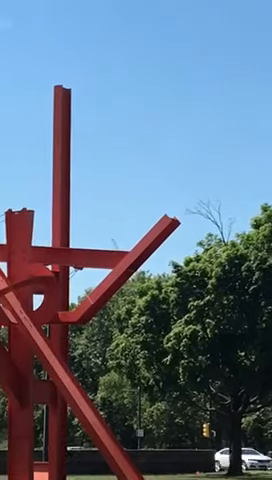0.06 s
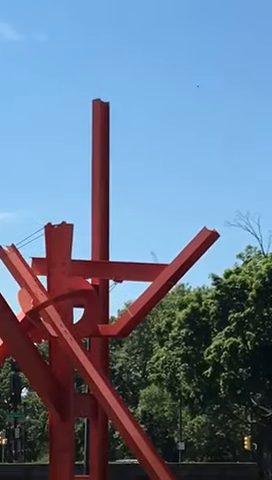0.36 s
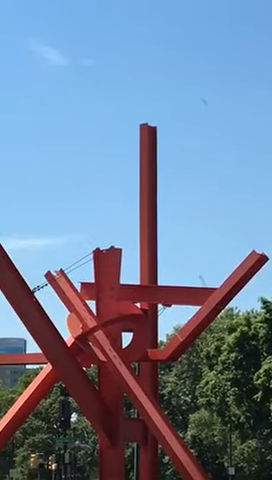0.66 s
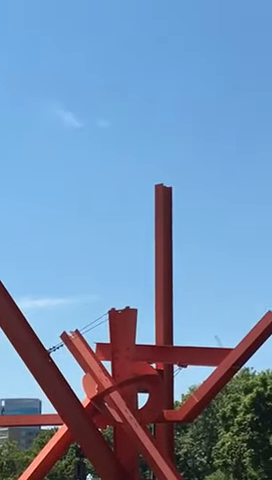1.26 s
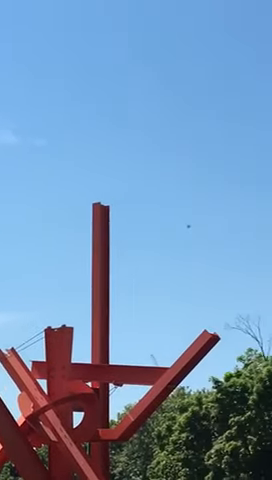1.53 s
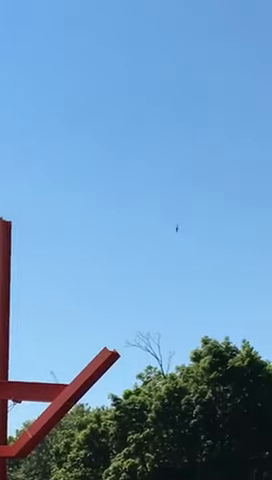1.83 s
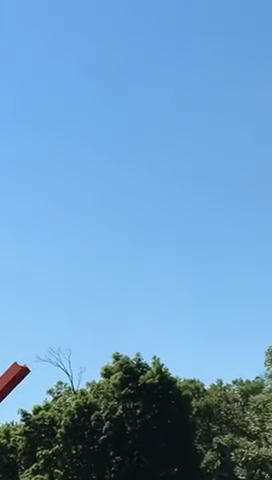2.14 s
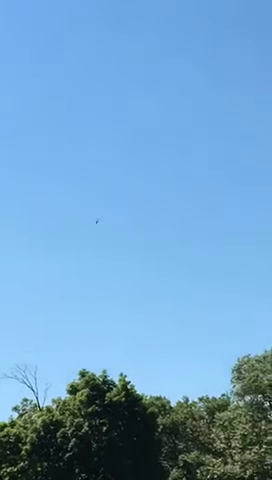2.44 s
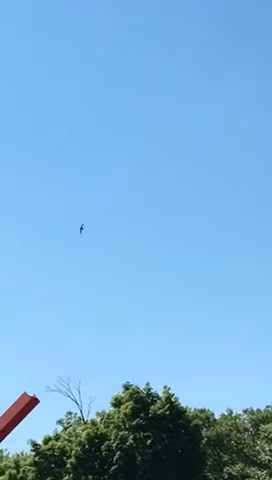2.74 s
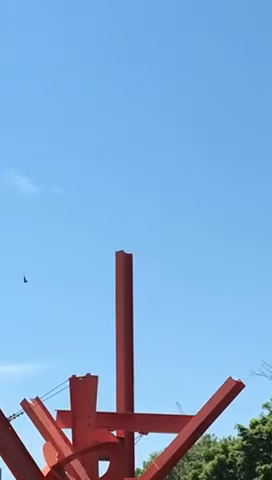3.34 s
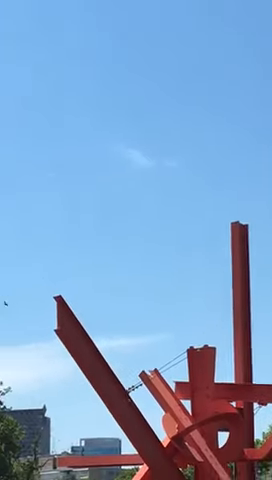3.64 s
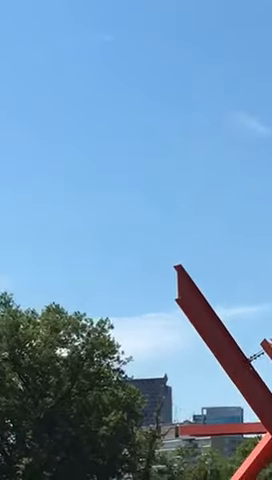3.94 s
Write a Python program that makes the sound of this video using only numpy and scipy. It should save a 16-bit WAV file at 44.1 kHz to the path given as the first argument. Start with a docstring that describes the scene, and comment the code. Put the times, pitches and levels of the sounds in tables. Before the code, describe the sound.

Steady road traffic carries into a city park under the low drone and thin whine of a heavy engine. A few faint bird chirps and light ticks sound, tyres rush past midway, and the deep rumble builds.

```python
"""City traffic heard from a park. From the start a heavy engine drones and growls over the rumble and
hiss of the streets, slowly gathering speed, its fan whining along. In the first second small birds chip
and whistle overhead, echoing off the trees, and a dry tick sounds close by; fainter ones follow.
Around two seconds in, passing tyres swell to a roar and hiss, and the birds chip again.
Toward the end the fan whine sinks away while the drone and the deep rumble build."""
import sys
import numpy as np
from scipy import signal
from scipy.fft import rfft, irfft
from scipy.io import wavfile
from scipy.ndimage import uniform_filter1d

SR = 44100
rng = np.random.default_rng(int(sys.argv[2]) if len(sys.argv) > 2 else 0)


def materialize(psi):
    """Save the field psi as 16-bit PCM at rate SR to the path in sys.argv[1].

    A 1-D psi becomes a single channel; in a 2-D psi each row is a channel.
    """
    bounded = np.clip(np.atleast_2d(psi).T, -1, 1)
    quanta = np.round(bounded * 32767).astype(np.int16)
    wavfile.write(sys.argv[1], SR, quanta)


N = 176400
TIME = np.arange(N) / SR

# engine firing rate (time [s], rate [Hz])
FIRING_RATE = [(0, 66), (.75, 66.6), (1.25, 67.7), (1.75, 68.3), (2.1, 69.2), (2.55, 69.6), (2.9, 70.9),
               (3.12, 71.2), (3.27, 72.2), (3.42, 72.2), (3.55, 73.1), (4, 74.3)]
# level rides for the firing tone and its octave (time [s], level [dB])
DRONE_LEVEL = [(0, -25), (.2, -26), (.29, -35), (.36, -26), (.6, -25.5), (.8, -23), (1.1, -23.5),
               (1.21, -33), (1.4, -23.5), (1.65, -23), (1.92, -25.5), (2.05, -20.5), (2.3, -25.5),
               (2.44, -21), (2.6, -24), (2.76, -19), (2.98, -21), (3.1, -18.5), (3.3, -21), (3.45, -19),
               (3.68, -19.5), (3.75, -16), (3.83, -20.5), (4, -17.5)]
OCTAVE_LEVEL = [(0, -37), (.3, -32.5), (.48, -33), (.59, -40), (.67, -32), (.82, -32), (1.02, -24),
                (1.16, -30), (1.3, -24.5), (1.95, -24.5), (2.2, -22), (2.58, -21), (2.72, -24), (2.95, -23),
                (3.27, -33), (3.38, -27), (3.55, -33), (3.63, -25), (3.85, -36), (4, -31)]
# weaker engine tones (pitch [x firing rate], crest level [dB], crest time [s], time to fall 6 dB [s])
SHAFT_TONES = [(.67, -39, 3.4, 2.2), (1.33, -44, 2.5, 3), (1.67, -43, 2, 3), (3, -42, 1.5, 1.5),
               (3.55, -48, 1.4, .5), (4.23, -43, 1.25, .45), (4.23, -48, 3.7, .9), (4.78, -48, 2.9, .4),
               (5.17, -52, 1.5, 1.3), (5.18, -47.5, 3.5, .5), (9.62, -51, 2.8, .3), (9.62, -52, 2.08, .18),
               (20.48, -50, 3.2, .08), (20.48, -50, 3.45, .07), (22.6, -56, 2.92, .25)]
# level ride for the fan whine (time [s], relative level [dB])
FAN_LEVEL = [(0, -45), (.4, -46.5), (.9, -45), (1.2, -41.5), (1.6, -39.5), (1.85, -42), (2.05, -35),
             (2.33, -39.5), (2.55, -38), (3, -37.5), (3.3, -40), (3.7, -53), (4, -55)]

# EQ curves of the noise layers (frequency [Hz], relative level [dB])
GROWL_EQ = [(90, -5.5), (170, 2), (240, 0.5), (300, 4), (360, -7.5), (430, -17.5), (800, -19), (2000, -58),
            (6000, -80)]  # rough exhaust
STREET_EQ = [(15, -77), (30, -67), (45, -51), (100, -41.5), (170, -51.5), (250, -54.5), (360, -56.5),
             (430, -62.5), (620, -62), (780, -63.5), (980, -63.5), (1400, -73.5), (1900, -71),
             (2200, -76.5), (2550, -76.5), (3000, -80.5), (4200, -82), (4900, -87), (6000, -89.5),
             (7500, -94.5), (9500, -95), (10500, -102), (12000, -101)]  # steady street bed
RUMBLE_EQ = [(12, -35.5), (28, -17.5), (36, -10.5), (46, -1), (70, -6), (110, -4), (170, -25.5),
             (600, -65.5), (2000, -100)]  # low end of the traffic
RUSH_EQ = [(300, -25.5), (600, 0.5), (780, -4.5), (980, 3), (1300, -4.5), (1700, -8.5), (2300, -20),
           (4000, -40)]  # distant tyres
ROAR_EQ = [(200, -25.5), (450, -10.5), (700, -3.5), (1150, 2.5), (1600, -1), (2100, -5), (2600, -5.5),
           (3200, -12.5), (4100, -14.5), (4900, -24), (8000, -41.5), (12000, -54)]  # body of the passing tyres
HISS_EQ = [(2000, -23), (4000, -1.5), (4900, -6.5), (5600, 0.5), (6600, 0), (7600, -7), (9000, -11),
           (10300, -27), (12000, -19.5)]  # their top end
# level rides for the layers that swell and fade (time [s], level [dB])
GROWL_LEVEL = [(0, -42.5), (.35, -41), (1.1, -43.5), (1.28, -36), (1.5, -40.5), (1.95, -41.5),
               (2.35, -43.5), (2.8, -43), (3.5, -42.5), (4, -42.5)]
RUMBLE_LEVEL = [(0, -41), (.8, -36.5), (1.4, -38), (2.1, -36.5), (2.75, -38.5), (3.1, -34), (3.8, -28.5)]
RUSH_LEVEL = [(0, -53), (.9, -53.5), (1.25, -47.5), (1.7, -50), (2.4, -55.5), (2.7, -47), (3.3, -47),
              (4, -56)]
ROAR_LEVEL = [(0, -52.5), (1, -51), (1.3, -52), (1.7, -49.5), (1.9, -42.5), (2.25, -41), (2.6, -45),
              (3, -50), (3.5, -50), (4, -47)]
HISS_LEVEL = [(0, -74.5), (1.7, -75), (1.95, -58.5), (2.2, -63.5), (2.45, -59.5), (2.8, -60.5), (3.1, -71),
              (3.45, -68), (3.75, -63), (4, -64)]

# bird notes: quick, mostly falling chips and longer, flatter whistles
# (time [s], length [s], start pitch [Hz], end pitch [Hz], peak level [dB])
BIRD_CHIPS = [(.074, 0.0091, 7250, 5000, -51.5), (0.128, 0.012, 7000, 5130, -50.5),
              (.188, 0.005, 6800, 6000, -49), (.205, 0.014, 5640, 4460, -58),
              (0.443, 0.0084, 5360, 5600, -56), (0.468, .023, 6100, 4300, -51.5),
              (1.962, 0.015, 7550, 6560, -55), (2.01, 0.0063, 8400, 6600, -48.5),
              (2.053, 0.014, 7400, 6170, -51.5), (2.11, 0.0085, 6600, 6050, -54.5),
              (2.692, 0.013, 7870, 6560, -52), (2.757, 0.015, 6470, 5270, -53)]
BIRD_WHISTLES = [(.352, .045, 4520, 4300, -50.5), (.36, .04, 3850, 3750, -56),
                 (.402, .042, 2480, 2570, -45.5), (.62, .085, 4030, 4200, -58),
                 (.69, .045, 4250, 4700, -58)]
# close ticks (time [s], level [dB], decay [s], treble tilt [dB/octave])
TICK_CUES = [(.181, -35, .0022, -3.5), (.758, -61, .01, 2), (1.251, -56, .003, -1), (1.715, -57, .011, 6),
             (1.802, -58, .002, 3), (1.818, -58, .005, 2), (2.84, -57.5, .01, 5), (3.408, -62, .004, 4),
             (3.683, -55, .004, -2)]
# their shared EQ curve (frequency [Hz], relative level [dB])
TICK_EQ = [(500, -14), (1800, 5), (4000, 1), (6500, 0), (9500, -2), (12000, -9)]

TOP_HZ = 11900


def amp(db):
    """Decibels to gain."""
    return 10 ** (np.asarray(db) / 20)


def unit(x):
    """Scales to rms 1."""
    return x / np.sqrt(np.mean(abs(x) ** 2) + 1e-20)


def ride(points):
    """An automation lane: straight lines between (time, value) rows."""
    return np.interp(TIME, *np.transpose(points))


def eq_db(points, hz):
    """Reads an EQ curve in dB on a log-frequency axis."""
    corners, db = np.transpose(points)
    return np.interp(np.log(hz + 1), np.log(corners), db)


def add(mix, start, sound):
    """Drops a sound into the mix at a time in seconds."""
    part = mix[max(round(start * SR), 0):][:len(sound)]
    part += sound[:len(part)]


def wander(rate_hz):
    """Smooth random modulation of rms 1, rolled off above rate_hz."""
    hz = np.fft.rfftfreq(N, 1 / SR)
    lowpass = (hz > 0) / np.sqrt(1 + (hz / rate_hz) ** 4) * np.exp(-hz / (10 * rate_hz))
    return unit(irfft(rfft(rng.standard_normal(N)) * lowpass, N))


def wash(eq, patch_db=1.58, swell_db=.5):
    """Coloured noise of rms 1 in which patches drift as the air moves."""
    hz = np.fft.rfftfreq(4096, 1 / SR)
    real, imag, patches = rng.standard_normal((3, N // 1024 + 6, len(hz)))
    patches = uniform_filter1d(patches, size=5, axis=0)  # smear in time
    patches = unit(uniform_filter1d(patches, size=14, axis=1))  # and in frequency
    frames = (real + 1j * imag) * amp(eq_db(eq, hz) + patch_db * patches)
    noise = signal.istft(frames.T, nperseg=4096, noverlap=3072)[1][:N]
    return unit(noise * amp(swell_db * wander(rate_hz=12)))


def engine_drone(firing_phase, drone_waver_db=.6, shaft_waver_db=3):
    """The exhaust hums at the firing rate and its octave; weaker shaft tones each swell once."""
    drone_gain = amp(ride(DRONE_LEVEL) + drone_waver_db * wander(rate_hz=9))
    octave_gain = amp(ride(OCTAVE_LEVEL) + drone_waver_db * wander(rate_hz=9))
    tones = drone_gain * np.cos(firing_phase) - octave_gain * np.cos(2 * firing_phase)
    for multiple, crest_db, crest_time, width in SHAFT_TONES:
        swell_db = crest_db - 6 * ((TIME - crest_time) / width) ** 2
        waver_db = shaft_waver_db * (wander(rate_hz=4.3) - .5)
        tones += amp(swell_db + waver_db) * np.cos(multiple * firing_phase + 2 * np.pi * rng.random())
    return np.sqrt(2) * tones


def fan_whine(firing_phase, multiple=7.67, throb_hz=6.3, flutter_hz=22.1, clean_db=-3, flutter_db=-7.5):
    """The fan turns with the engine: a clean, throbbing whine with a random flutter around it."""
    flutter = unit(wander(flutter_hz) + 1j * wander(flutter_hz))
    throb_cycles = throb_hz * TIME + .2 * wander(throb_hz / 2)  # a slightly uneven beat
    throb = 1 + .4 * np.exp(-2j * np.pi * throb_cycles)
    whine = (amp(clean_db) * throb + amp(flutter_db) * flutter) * np.exp(1j * multiple * firing_phase)
    return np.sqrt(2) * amp(ride(FAN_LEVEL)) * whine.real


def exhaust_growl(firing_phase, pulse_depth=.35):
    """Rough, low exhaust noise that pulses with each firing."""
    pulsing = 1 + pulse_depth * np.cos(firing_phase)
    return amp(ride(GROWL_LEVEL)) * unit(wash(GROWL_EQ) * pulsing)


def streets(bed_db=-36.5):
    """The steady bed of the streets, with a deep rumble building underneath."""
    return amp(bed_db) * wash(STREET_EQ) + amp(ride(RUMBLE_LEVEL)) * wash(RUMBLE_EQ)


def tyres():
    """Tyres on the road: a distant rush, and the roar and hiss as they roll by."""
    rush = amp(ride(RUSH_LEVEL)) * wash(RUSH_EQ)
    roar = amp(ride(ROAR_LEVEL)) * wash(ROAR_EQ)
    hiss = amp(ride(HISS_LEVEL)) * wash(HISS_EQ)
    return rush + roar + hiss


def birds(waver_depth=.012, glide_power=1.15):
    """Each note is one gliding, slightly unsteady sine under a smooth arch."""
    out = np.zeros(N)
    waver = 1 + waver_depth * wander(rate_hz=90)
    for start, length, from_hz, to_hz, db in BIRD_CHIPS + BIRD_WHISTLES:
        progress = np.arange(0, length, 1 / SR) / length
        glide = from_hz + (to_hz - from_hz) * progress ** glide_power
        hz = glide * waver[round(start * SR):][:len(glide)]
        arch = np.sin(np.pi * progress)
        add(out, start, amp(db) * arch * np.sin(2 * np.pi * np.cumsum(hz) / SR))
    return out


def tree_echoes(sound, wet_db=-9, t60_s=.41):
    """The trees scatter a sound back as a thin, short reverb tail."""
    t = TIME[:SR // 2]
    tail = rng.standard_normal(len(t)) * amp(-60 * t / t60_s)
    return sound + amp(wet_db) * signal.fftconvolve(sound, tail / np.linalg.norm(tail))[:N]


def ticks(attack_s=.001, tilt_from_hz=1000):
    """Short, dry bursts of noise close by, some dull and some bright."""
    out, t = np.zeros(N), TIME[:SR // 10]
    hz = np.fft.rfftfreq(len(t), 1 / SR)
    for start, db, decay, tilt in TICK_CUES:
        colour = amp(eq_db(TICK_EQ, hz) + tilt * np.log2(1 + hz / tilt_from_hz)) * (hz < TOP_HZ)
        noise = unit(irfft(rfft(rng.standard_normal(len(t))) * colour, len(t)))
        envelope = np.minimum(t / attack_s, 1) * np.exp(-t / decay)
        add(out, start, amp(db) * envelope * noise)
    return out


def scene():
    """The mono mix: three engine layers locked to one speed, then streets, tyres, birds and ticks."""
    firing_phase = 2 * np.pi * np.cumsum(ride(FIRING_RATE)) / SR
    engine = engine_drone(firing_phase) + fan_whine(firing_phase) + exhaust_growl(firing_phase)
    return (engine + streets() + tyres() + tree_echoes(birds()) + ticks())[None]


def record(dry):
    """A 3 ms fade at each end, then a steep high cut."""
    fade = np.minimum(np.minimum(TIME, TIME[::-1]) / .003, 1)
    high_cut = signal.firwin(511, TOP_HZ, window=("kaiser", 9), fs=SR)
    return signal.oaconvolve(dry * fade, high_cut[None], "same")


dry = scene()
out = record(dry)
materialize(out)
```